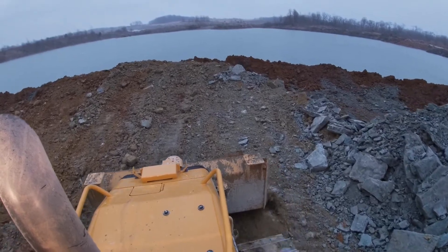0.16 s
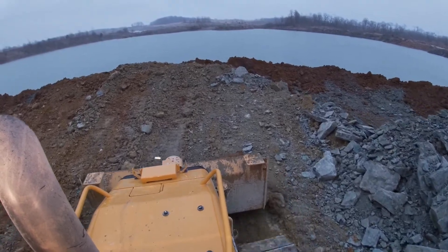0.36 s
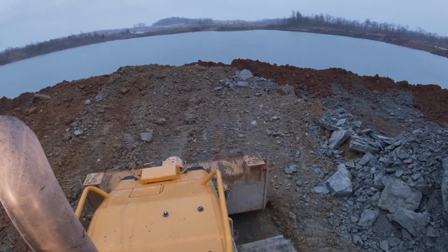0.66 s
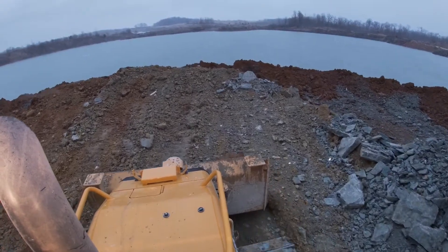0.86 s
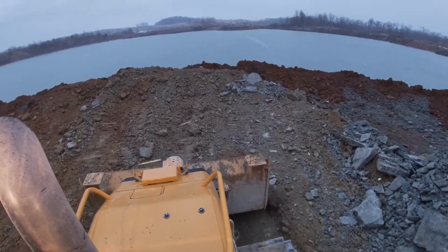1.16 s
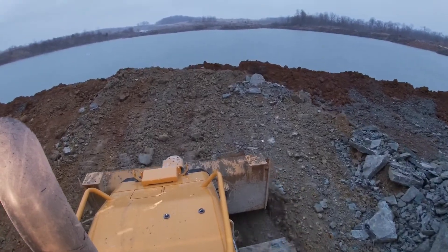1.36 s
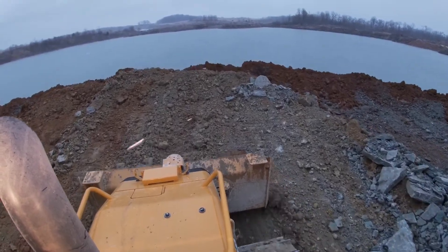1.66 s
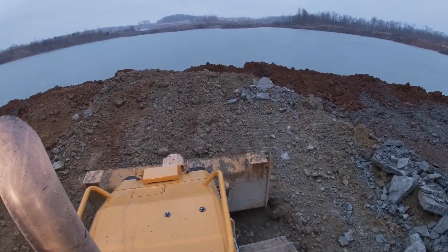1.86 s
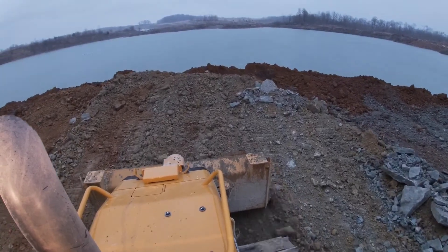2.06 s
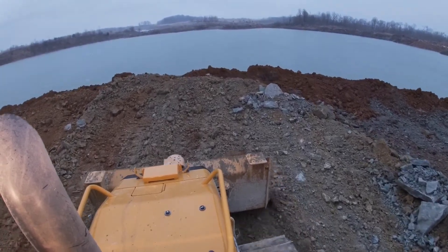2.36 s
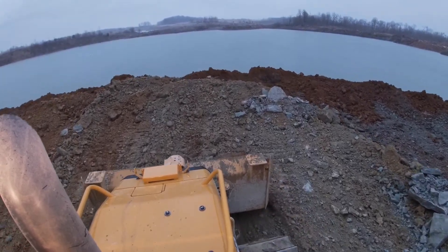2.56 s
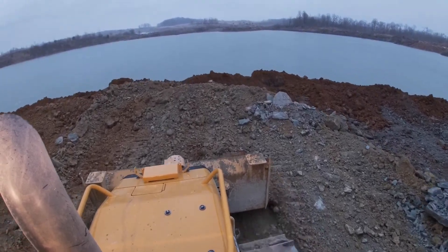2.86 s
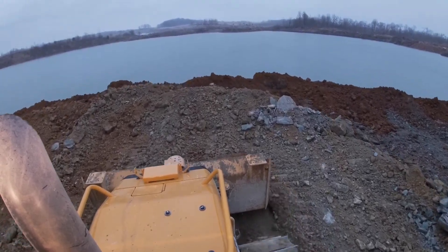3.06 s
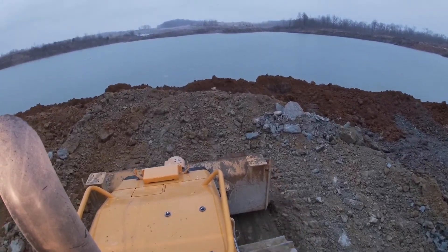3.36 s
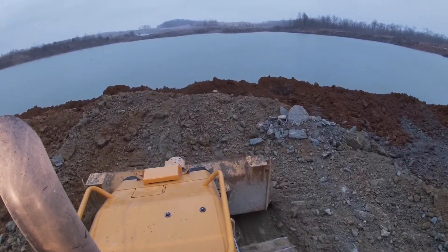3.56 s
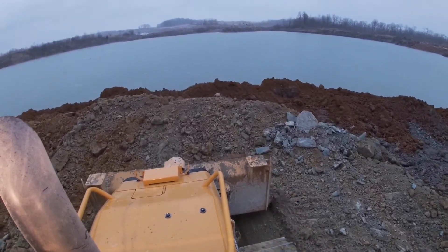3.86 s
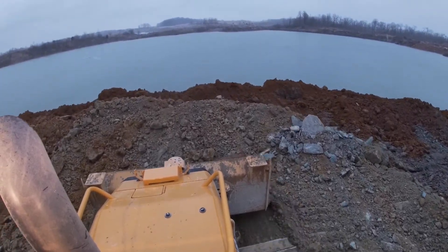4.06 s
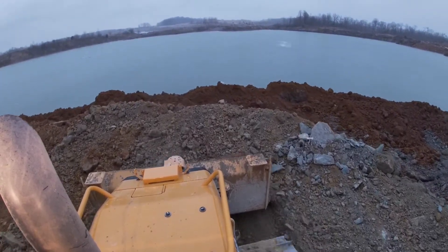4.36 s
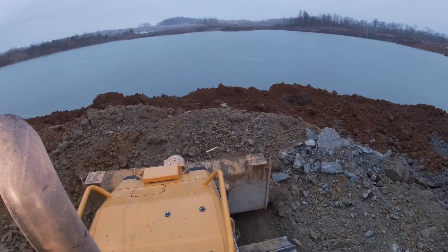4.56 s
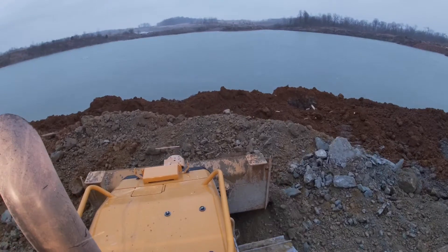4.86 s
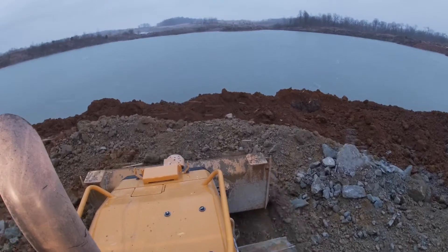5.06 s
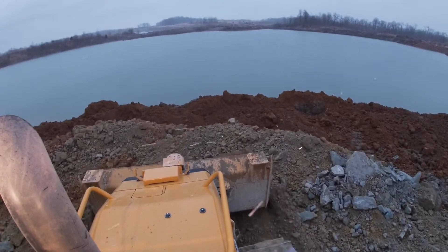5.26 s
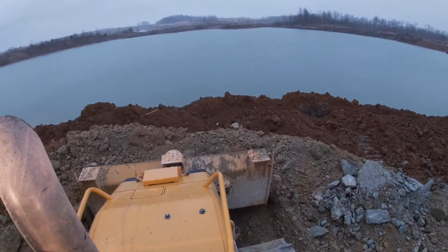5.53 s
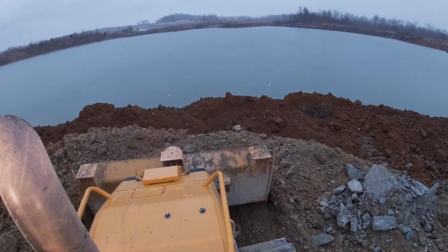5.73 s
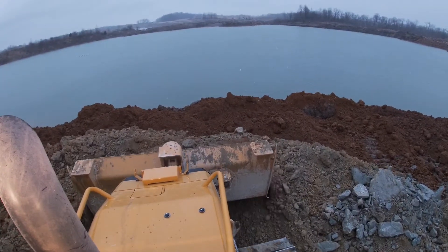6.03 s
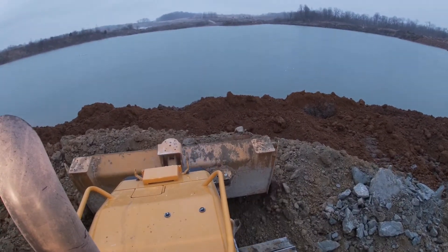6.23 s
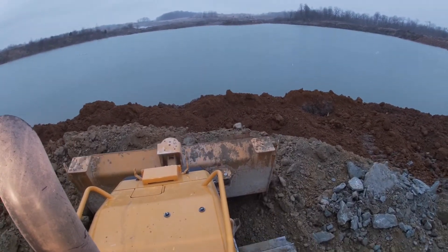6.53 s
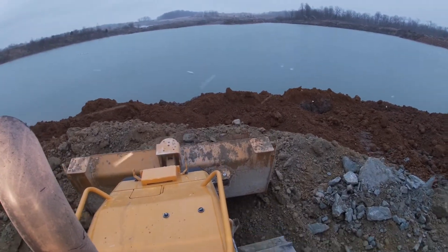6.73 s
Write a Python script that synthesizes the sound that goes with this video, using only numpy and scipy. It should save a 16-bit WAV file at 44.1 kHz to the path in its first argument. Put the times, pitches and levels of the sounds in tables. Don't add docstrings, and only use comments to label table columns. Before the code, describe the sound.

Close on the cab roof of a bulldozer outdoors: a steady hydraulic drone around a low-mid hum sits over a rattling diesel. Track shoes knock about eight times a second, grit grinds beneath, stones click on steel and the fan hisses. After five seconds the engine sags, surges into a brief roar and settles as the tracks slow.

```python
import sys
import numpy as np
from scipy import signal
from scipy.fft import rfft, irfft, next_fast_len
from scipy.io import wavfile
from scipy.ndimage import uniform_filter1d, map_coordinates

SR = 44100
rng = np.random.default_rng(int(sys.argv[2]) if len(sys.argv) > 2 else 0)


def to_wav(sig):
    pcm = np.clip(np.atleast_2d(sig), -1, 1) * 32767
    pcm = np.round(pcm).astype(np.int16)
    wavfile.write(sys.argv[1], SR, pcm.T)


def attenuation_scalar(level_db):
    decades = np.asarray(level_db, float) / 20
    return 10 ** decades


N = 303849

# (time [s], pitch [Hz])
SPEED = [(0, 207.4), (.33, 202.5), (.75, 219), (1.1, 214.6), (2.0, 213.8), (2.48, 209.3), (2.7, 214.5),
         (3.3, 216.3), (3.75, 210.7), (4.45, 215.7), (4.9, 212.6), (5.22, 208), (5.4, 193), (5.52, 173),
         (5.65, 173), (6.04, 216.5), (6.42, 201.3), (6.89, 193)]
# (time [s], pump pressure [dB], exhaust [dB], fuelling [dB])
LOAD = [(0, -11.5, -24, 4), (.45, -17, -27.5, -0.5), (.6, -9.5, -26.5, 2), (1.9, -11.5, -25.5, 1.8),
        (2.55, -12, -27, 0.1), (2.8, -10.5, -24, 1), (3.5, -11, -26.5, 0), (3.7, -17.5, -33, 0),
        (3.95, -14, -31.5, 1.5), (4.25, -12, -24, 4), (4.9, -10.5, -25, 5.5), (5.05, -16.5, -26.5, 1.5),
        (5.27, -16.5, -31, 4), (5.6, -26.5, -32.5, 0), (5.78, -30, -43, 1.5), (6.05, -12, -16, 12),
        (6.35, -34, -15.5, 9.5), (6.89, -29.5, -30, 4)]
# (frequency [Hz], width [Hz], level [dB])
FRAME = [(269, 143, -1.5), (358.4, 93, 3), (442.4, 127, 2), (517.7, 170, -3), (666, 250, -11)]
# (frequency [Hz], width [Hz], level [dB])
HOOD = [(559.5, 50, -0.5), (727, 48, -2.5), (862, 35.4, 1.5), (1009, 114, 0), (1145, 217, -1),
        (1338, 220, -0.5), (1494, 540, -5.5), (2063, 383, -7.5), (2410, 710, -16.5)]
IDLE_PUMP_DB = -12
FIRST_SHOE_S, SHOE_S = .035, .1238


def unit(x):
    return x / np.sqrt(np.mean(x ** 2) + 1e-20)


def curves(rows):
    s, *cols = np.transpose(rows)
    return [np.interp(np.arange(N) / SR, s, c) for c in cols]


def wobble(rate):
    knots = rng.standard_normal(int(N * rate / SR) + 4)
    return map_coordinates(knots, [np.arange(N) * rate / SR])


def swells(events, width_s):
    coarse = np.arange(0, N / SR + .01, .002)
    bells = sum(db * np.exp(-((coarse - s) / width_s) ** 2) for s, db in events)
    return np.interp(np.arange(N) / SR, coarse, bells)


def filtered(x, response):
    m = next_fast_len(N + SR // 2)
    return irfft(rfft(x, m) * response(np.fft.rfftfreq(m, 1 / SR)), m)[:N]


def colour(points):
    f, db = np.transpose(points)
    return lambda hz: attenuation_scalar(np.interp(np.log(hz + 1), np.log(f + 1), db))


def body(modes, muffle_hz):
    def response(f):
        ring = 0
        for k, (centre, w, db) in enumerate(modes):
            ring = ring + (-1) ** k * attenuation_scalar(db) * 1j * f * w / (centre * centre - f * f + 1j * f * w)
        return ring / (1 + 1j * f / muffle_hz) ** 3
    return response


def patchy(patch_db):
    z = signal.stft(rng.standard_normal(N + 512), nperseg=512)[2]
    field = uniform_filter1d(rng.standard_normal(z.shape), 5, 0)
    field = uniform_filter1d(field, 12, 1)
    return signal.istft(z * attenuation_scalar(patch_db * unit(field)), nperseg=512)[1][:N]


def tone(turns, db, shake, flutter_db):
    size = np.sqrt(2) * attenuation_scalar(db + flutter_db * wobble(14))
    return size * np.cos(2 * np.pi * turns + shake * wobble(18))


def blows(events, modes, rise_s, damping):
    out, t = np.zeros(N + SR), np.arange(SR // 20) / SR
    hz, width, level_db = np.transpose(modes)[:, :, None]
    fade = np.exp(-np.pi * damping * width * t) * (1 - np.exp(-t / rise_s)) ** 2
    for s, db in events:
        strength, detune, phase = rng.standard_normal((3, len(modes), 1))
        sines = np.sin(2 * np.pi * hz * (1 + .05 * detune) * t + 2 * phase)
        ring = np.sum(attenuation_scalar(level_db + 2.1 * strength) * fade * sines, axis=0)
        size = np.abs(signal.hilbert(ring))
        start = max(round(s * SR) - np.argmax(size), 0)
        out[start:][:len(t)] += attenuation_scalar(db) * ring / size.max()
    return out[:N]


def crankshaft():
    turns = np.cumsum(curves(SPEED)[0]) / SR
    return turns, .328 * turns


def pump_drone(turns):
    pump_db = curves(LOAD)[0]
    hum = tone(turns, pump_db, shake=0.18, flutter_db=1.1)
    return hum + tone(2 * turns, 0.35 * pump_db - 27, shake=0.6, flutter_db=2.5)


def exhaust(fires):
    pump_db, second_db, fuel_db = curves(LOAD)
    first_db = -38 + .4 * (IDLE_PUMP_DB - pump_db) + .6 * fuel_db
    second = tone(2 * fires, second_db, shake=.4, flutter_db=1.2)
    return second + tone(fires, first_db + 1.5, shake=0.6, flutter_db=3)


def gear_whine(fires):
    # (multiple of firing rate [1], level [dB])
    orders = [(9, -42), (18, -46), (30, -60), (36, -68)]
    return sum(tone(k * fires, db, shake=1.0, flutter_db=4.5) for k, db in orders)


def clatter(fires):
    puff = 1 + 0.055 * np.cos(2 * np.pi * fires)
    rattle = unit(filtered(puff * patchy(patch_db=1), body(HOOD, muffle_hz=3780)))
    surge = attenuation_scalar(.7 * wobble(10))
    return attenuation_scalar(-30 + curves(LOAD)[2]) * surge * rattle


def engine():
    turns, fires = crankshaft()
    return pump_drone(turns) + exhaust(fires) + gear_whine(fires) + clatter(fires)


def crawl(count=46):
    k = np.arange(count)
    stop_lag_s, growth = .1, .8
    return FIRST_SHOE_S + SHOE_S * k + stop_lag_s * np.exp(growth * (k - k[-1]))


def landings(order=14):
    # (time [s], level [dB])
    hard_shoes = [(.03, -5), (.418, -12), (0.546, -8), (.665, -9.5), (1.391, -9), (1.512, -15.5),
                  (1.759, -9.5), (1.888, -13.5), (2.008, -12), (2.134, -6), (2.259, -11.5), (2.37, -12),
                  (2.513, -11), (2.89, -11.5), (3.008, -9), (3.137, -12.5), (3.377, -8.5), (3.743, -11.5),
                  (3.872, -11), (3.992, -8.5), (4.122, -6.5), (4.242, -9), (4.372, -10), (4.617, -14),
                  (4.739, -14.5), (4.864, -16), (5.247, -6), (5.38, -7.5), (5.706, -12), (6.207, -11)]
    due = crawl()
    soft = [(s, -14) for s in due if min(abs(s - hard) for hard, _ in hard_shoes) > SHOE_S / 4]
    far = [(s - .015, -15) for s in due[11::3]]
    loose = [(s * due[-1], -14.5 + db) for s, db in rng.random((order, 2))]
    return list(map(tuple, hard_shoes)) + soft + far + loose


def track_bed():
    sizes = attenuation_scalar(3 * rng.exponential(size=N)) * (rng.random(N) < 2500 / SR)
    grit = np.minimum(sizes, 8) * rng.standard_normal(N)
    bed = unit(filtered(grit, body(FRAME, muffle_hz=1700)))
    pump_db, _, fuel_db = curves(LOAD)
    rattle_db = -19.5 + .55 * fuel_db - 0.14 * (IDLE_PUMP_DB - pump_db)
    grind_db = swells([(s - .006, 6) for s in crawl()], width_s=.016)
    drift_db = .9 * wobble(3.3)
    return attenuation_scalar(rattle_db - 4.0 + grind_db + drift_db) * bed


def shoe_knocks():
    firm = [(s, db + .25 * (db + 12)) for s, db in landings()]
    knocks = blows(firm, FRAME, rise_s=.0025, damping=.9)
    scuffs = attenuation_scalar(-6) * blows(firm, FRAME, rise_s=.016, damping=.35)
    pins = attenuation_scalar(-16) * blows(firm, HOOD[4:], rise_s=.001, damping=1.2)
    return knocks + scuffs + pins


def stones():
    # (time [s], level [dB])
    chips = [(0.03, -26), (0.162, -22), (0.207, -25), (0.641, -26), (0.942, -24), (1.226, -26),
             (1.471, -23), (3.376, -22), (1.588, -25), (1.983, -25), (2.248, -25), (2.387, -26),
             (3.238, -26), (3.52, -27), (3.731, -24), (3.872, -23), (3.983, -25), (4.477, -21),
             (4.606, -23), (4.721, -23), (4.864, -19), (5.07, -25), (5.236, -19), (5.583, -25),
             (5.637, -25), (5.694, -25), (6.854, -22)]
    # (time [s], level [dB])
    clanks = [
        (4.478, -22),
        (5.236, -17),
    ]
    # (frequency [Hz], width [Hz], level [dB])
    blade = [(1153, 60, -5), (1490, 70, 0), (1652, 84, 2.5), (1920, 97, -4)]
    clicks = blows(chips, HOOD[4:], rise_s=.002, damping=.7)
    return clicks + blows(clanks, blade, rise_s=.003, damping=.6)


def cab_shake():
    # (frequency [Hz], density [dB per Hz])
    ground = [(8, -47), (25, -7), (50, -4), (70, -13.5), (85, -1.5), (110, -6), (170, 1.5), (240, -5.5),
              (320, -18.5), (500, -120)]
    # (time [s], swell [dB])
    jolts = [(.03, 21), (.31, 13), (1.6, 14), (1.88, 12), (3.7, 13.5), (3.95, 10), (4.4, 21.5), (4.72, 14),
             (5.41, 21), (6.1, 27), (6.28, 25), (6.5, 17), (6.8, 21.5)]
    pump_db, _, fuel_db = curves(LOAD)
    rumble_db = -32 + .2 * fuel_db + .1 * (IDLE_PUMP_DB - pump_db)
    rumble = unit(filtered(rng.standard_normal(N), colour(ground)))
    rumble = attenuation_scalar(rumble_db + 6.5 + 0.57 * wobble(4.6)) * rumble
    deep = lambda hz: hz / (hz + 25) / (1 + (hz / 100) ** 4)
    heave = unit(filtered(rng.standard_normal(N), deep))
    return rumble + attenuation_scalar(-39 + swells(jolts, width_s=0.084)) * heave


def cooling_fan():
    # (frequency [Hz], density [dB per Hz])
    air = [(1000, -120), (1500, -27), (2600, 7), (3200, -1.5), (4000, 0), (4900, 1.5), (5600, -3),
           (6600, -5.5), (7200, -11), (9000, -18), (10000, -28.5), (11700, -26.5), (13000, -27),
           (15500, -55.5)]
    fuel_db = curves(LOAD)[2]
    throb = 1 + 0.068 * np.cos(2 * np.pi * crankshaft()[1])
    hiss = unit(filtered(throb * patchy(patch_db=.5), colour(air)))
    sheen = filtered(hiss, lambda hz: 1 / (1 + (7500 / (hz + 1)) ** 4))
    hiss = hiss + (attenuation_scalar(.2 * fuel_db + 1.4 * wobble(5.6)) - 1) * sheen
    return attenuation_scalar(-51.5 + 0.89 * fuel_db + 2.0 + 0.35 * wobble(8.2)) * hiss


def scene():
    tracks = track_bed() + shoe_knocks() + stones()
    return (engine() + tracks + cab_shake() + cooling_fan())[None]


def top_cut(x):
    return signal.sosfilt(signal.butter(12, 15500, fs=SR, output="sos"), x)


def record(dry):
    heard = np.abs(filtered(dry[0], lambda hz: (1j * hz / (1j * hz + 330)) ** 4))
    over_db = .7 * np.maximum(20 * np.log10(heard + 1e-9) + 21.5, 1e-3)
    release = np.arange(N) / SR / .045
    duck_db = np.exp(np.maximum.accumulate(np.log(over_db) + release) - release)
    level = dry * attenuation_scalar(2.5 - uniform_filter1d(duck_db, size=160, origin=79))
    rounded = level / (1 + np.abs(level / .8) ** 6) ** (1 / 6)
    return top_cut(rounded)


dry = scene()
out = record(dry)
to_wav(out)
```